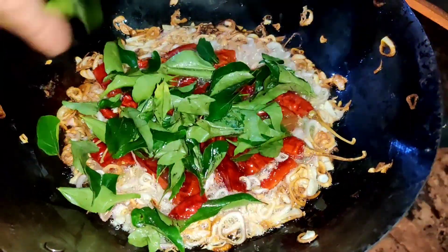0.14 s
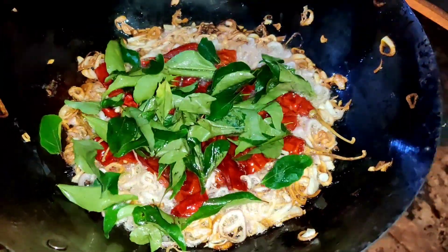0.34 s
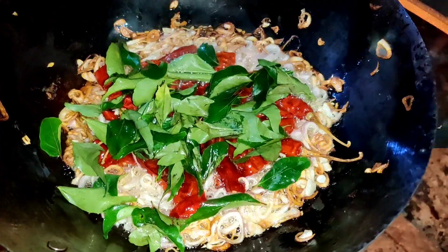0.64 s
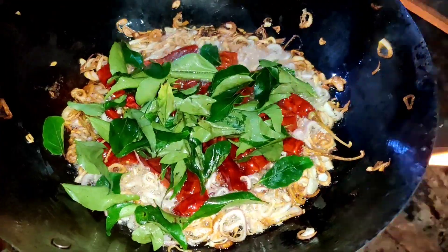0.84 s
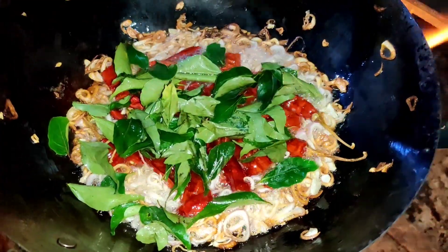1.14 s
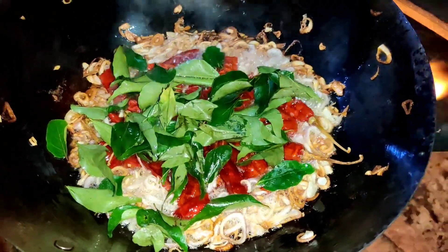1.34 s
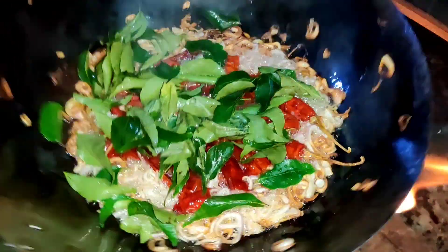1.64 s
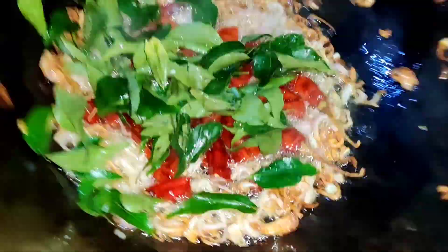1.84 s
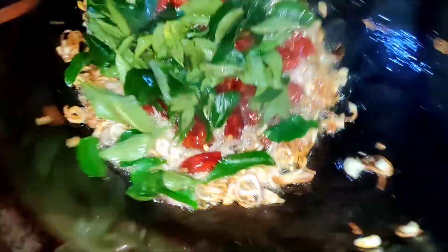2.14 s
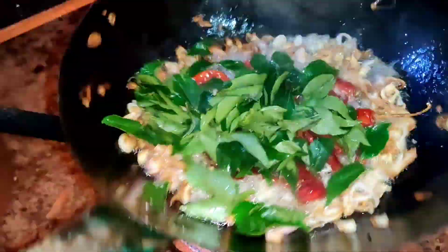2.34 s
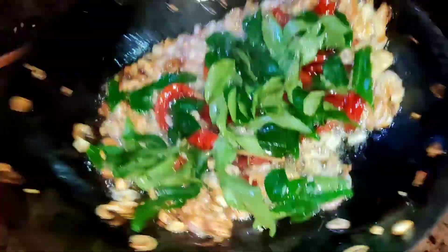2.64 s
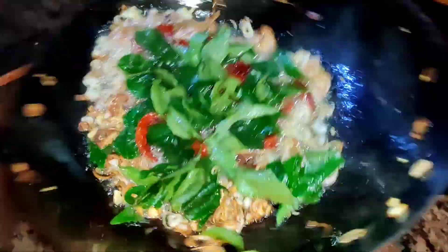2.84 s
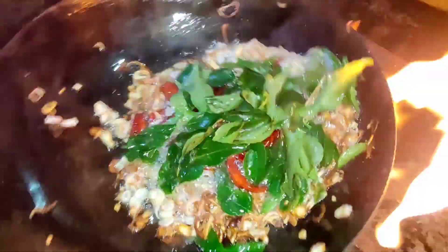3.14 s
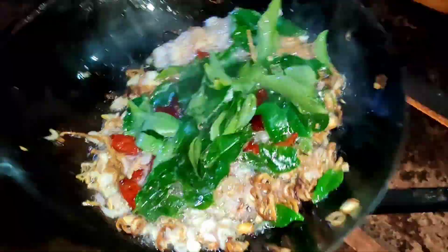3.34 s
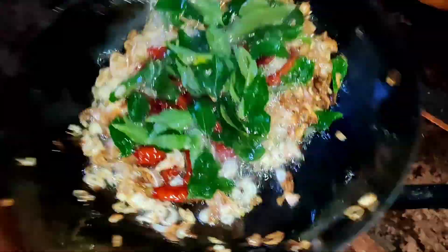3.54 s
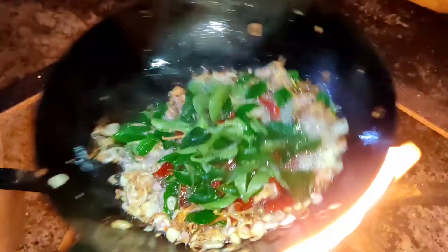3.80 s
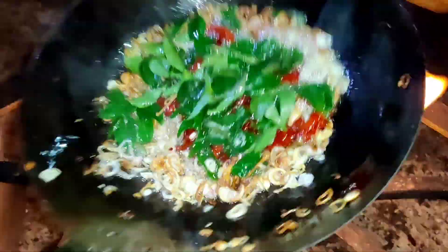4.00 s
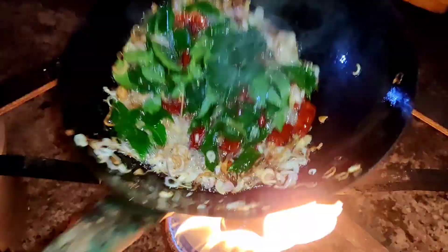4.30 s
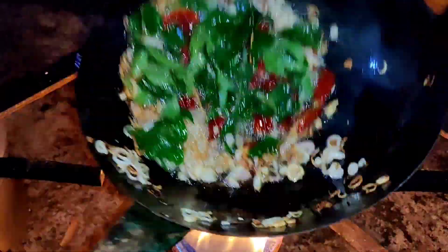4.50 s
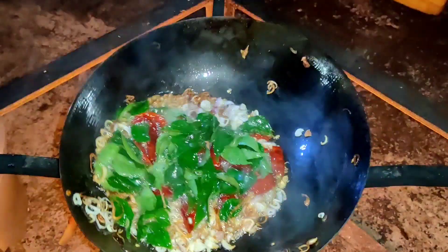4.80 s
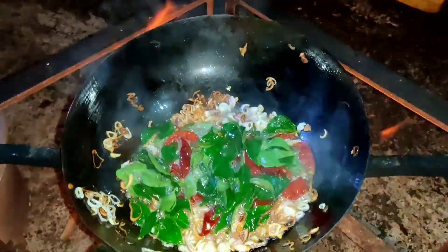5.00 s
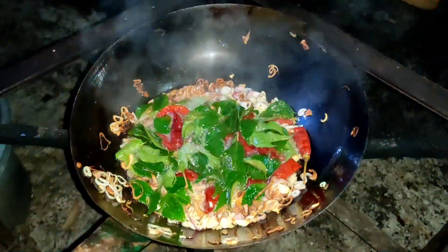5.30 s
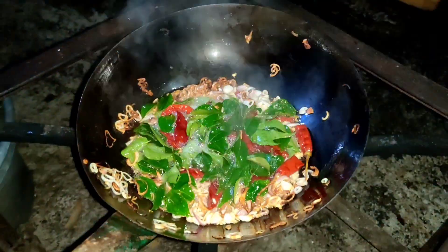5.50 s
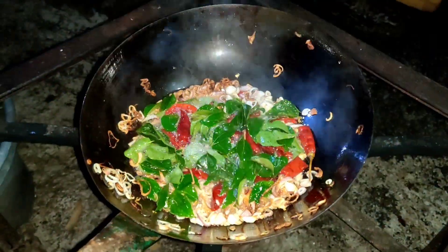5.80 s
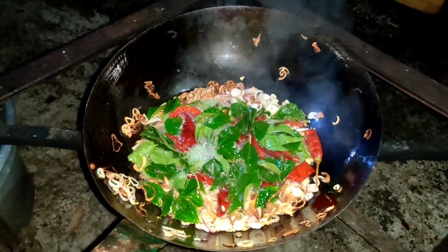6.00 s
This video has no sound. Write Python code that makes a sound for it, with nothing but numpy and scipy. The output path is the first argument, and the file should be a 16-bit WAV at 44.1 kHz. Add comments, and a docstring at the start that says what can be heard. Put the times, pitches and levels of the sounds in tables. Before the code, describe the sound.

Wet leaves crackle, bubble and spit fiercely in hot oil, then a shaken steel wok knocks and grates on its stand before settling to a steady sizzle.

```python
"""Wet leaves fry in hot oil in a steel wok over a gas flame, heard by the two ports of a hand-held phone.
0-1.2 s: plops (rising decaying sines) crowd over spits and fizz (random rings); droplets snap (noise bursts).
At 1.18 s the sound cuts over to another microphone colour. Then the shaken wok knocks and grates on its
stand (struck modes), plops thin out, and from 4.62 s it is set down. The flame (noise bands, a hum) runs
throughout; loud peaks push the gain down for a moment, and at set times the level dips briefly."""
import sys
import numpy as np
from scipy import signal
from scipy.io import wavfile
from scipy.ndimage import uniform_filter1d, minimum_filter1d

SR = 44100
rng = np.random.default_rng(int(sys.argv[2]) if len(sys.argv) > 2 else 0)


def persist_wave(psi):
    """Save psi, clipped to +-1, as 16-bit WAV."""
    counts = np.round(np.clip(psi, -1, 1) * 32767).astype(np.int16)
    wavfile.write(sys.argv[1], SR, np.atleast_2d(counts).T)


N = 271215
CUT_S, SET_DOWN_S = 1.184, 4.62


def from_db(db):
    """Decibels to gain."""
    return 10 ** (np.asarray(db) / 20)


def rms_one(x):
    """Scale to rms 1."""
    return x / np.sqrt(np.mean(x ** 2) + 1e-20)


def before(time_s):
    """True for the samples ahead of a time."""
    return np.arange(N) < time_s * SR


def in_time(rows):
    """Columns of a curve table, one value per sample."""
    times_s, *columns = np.transpose(rows)
    return [np.interp(np.arange(N) / SR, times_s, column) for column in columns]


def spans(rows, edge_s, value):
    """Sum of plateaus with straight edges, one per row of start, length and height."""
    t = np.arange(N) / SR
    total = np.zeros(N)
    for start_s, length_s, height in rows:
        inside_s = np.minimum(t - start_s, start_s + length_s - t)
        total += value(height) * np.clip(inside_s / edge_s, 0, 1)
    return total


def drift(rate_hz):
    """Slow chance with rms 1: coarse noise (every 40 samples) through a double one-pole low-pass."""
    r = np.exp(-2 * np.pi * rate_hz * 40 / SR)
    noise = rng.standard_normal(N // 40 + 2002)
    slow = signal.lfilter([1], [1, -2 * r, r * r], noise)[2000:]
    return np.interp(np.arange(N) / 40, np.arange(len(slow)), rms_one(slow))


def ring(clicks, hz, t60_s):
    """Two-pole resonator: a unit click sets off a decaying sine of height 1."""
    r, w = from_db(-60 / (t60_s * SR)), 2 * np.pi * hz / SR
    return signal.lfilter([0, np.sin(w)], [1, -2 * r * np.cos(w), r * r], clicks + 1e-18)


def band(x, low_hz, high_hz):
    """Butterworth band-pass."""
    return signal.sosfilt(signal.butter(2, [low_hz, high_hz], "band", fs=SR, output="sos"), x)


def high_pass(x, edge_hz):
    """Butterworth high-pass, 4th order."""
    return signal.sosfilt(signal.butter(4, edge_hz, "high", fs=SR, output="sos"), x)


def peaks(x, modes):
    """A chain of peaking filters."""
    for hz, width_hz, db in modes:
        a, w, q = from_db(db / 2), 2 * np.pi * hz / SR, np.tan(np.pi * width_hz / SR)
        numerator = [1 + q * a, -2 * np.cos(w), 1 - q * a]
        denominator = [1 + q / a, -2 * np.cos(w), 1 - q / a]
        x = signal.lfilter(numerator, denominator, x)
    return x


def grains(per_s, low_hz, high_hz, cycles, tilt_db, uneven_db, clump_db, count):
    """Bubbles burst at random all over the wok, so each reaches the two ports with its own lag and balance."""
    clumps = 0.29 * drift(9) + drift(60)
    at = np.flatnonzero(rng.random(N) < per_s * from_db(clump_db * clumps) / SR)
    size_db = uneven_db * np.minimum(rng.exponential(1, N), 4.0)
    size = from_db(size_db)[at] * rng.choice([-1, 1], N)[at]
    lag_spread_samples = np.where(at < CUT_S * SR, 4.8, 3.1)
    lag_samples = np.round(lag_spread_samples * rng.standard_normal(N)[at]).astype(int)
    late = np.clip(at + lag_samples, 0, N - 1)
    pan = from_db(2.0 * rng.standard_normal(N)[at] + 0.8)  # left times, right divided by
    dealt = rng.integers(0, count, N)[at]
    out = np.zeros((2, N))
    for k, hz in enumerate(np.geomspace(low_hz, high_hz, count)):
        clicks, mine = np.zeros((2, N)), dealt == k
        clicks[0, at[mine]] = (size * pan)[mine]
        np.add.at(clicks[1], late[mine], (size / pan)[mine])
        tilt = from_db(tilt_db * np.log2(hz / low_hz))  # dB per octave
        out += tilt * ring(clicks, hz, cycles / hz)
    return rms_one(out)


def flares():
    """Water meets hot oil: fizz gain in dB moves straight to each peak and back."""
    # fizz flares: (peak time [s], rise [s], fall [s], gain [dB])
    flare_rows = [(0.455, 0.012, 0.23, 8), (0.74, 0.024, .12, 1.5), (1.09, 0.085, .1, 4.5),
                  (1.62, 0.073, .1, 5), (1.82, 0.15, 0.031, 6), (2.18, 0.04, 0.087, 4),
                  (2.6, 0.12, 0.058, -1), (3.15, 0.33, 0.099, 3.5), (4.43, 0.025, .02, 3)]
    t = np.arange(N) / SR
    gain_db = np.zeros(N)
    for peak_s, rise_s, fall_s, db in flare_rows:
        gain_db += db * np.interp(t, [peak_s - rise_s, peak_s, peak_s + fall_s], [0, 1, 0])
    return gain_db


def frying():
    """Large bubbles ring low, spits ring higher, the fizz is dense and bright."""
    # the fry in three stretches joined end to end (0-1.18 s, 1.19-3.3 s, 3.31-6.15 s): (time [s], bubbling
    # [dB], spitting [dB], fizz [dB])
    fry_stretches = [
        [(0.0, -38, -39, -35.5), (0.128, -37.5, -38.5, -35.5), (0.358, -36.5, -37.5, -36.5),
         (0.598, -37, -39.5, -35.5), (0.736, -43.5, -39, -36.5), (1.022, -34, -37.5, -37.5),
         (1.18, -28, -32.5, -36.5)],
        [(1.19, -38.5, -38, -41.5), (1.4, -75, -35.5, -41), (1.57, -36, -38.5, -41), (1.82, -51, -37.5, -36),
         (2.12, -59, -36, -33.5), (2.69, -36.5, -36.5, -35.5), (3.3, -49, -36, -38)],
        [(3.31, -49, -36, -36.5), (3.59, -41.5, -37, -34), (4.52, -40.5, -38.5, -42), (4.78, -42, -43, -41),
         (5.19, -37, -37, -41.5), (5.37, -35, -35, -44), (6.15, -35.5, -38, -43.5)],
    ]
    # colour of the frying after set-down: (frequency [Hz], width [Hz], gain [dB])
    late_colour = [(810, 130, -5), (1130, 340, 5.5), (2000, 180, -1.5), (3950, 510, 3)]
    bubbling_db, spitting_db, fizz_db = in_time(np.vstack(fry_stretches))
    calm = np.where(before(5.17), 1, 0.6)  # bubbling evens out once the wok stands still
    bubbling = grains(1200, 680, 1880, cycles=2.55, tilt_db=14.0,
                      uneven_db=4.2 * calm, clump_db=6.0 * calm, count=8)
    spitting = grains(3000, 2260, 3920, cycles=4.8, tilt_db=4.5, uneven_db=4.0, clump_db=3.0, count=8)
    fizz = grains(9000, 5060, 16600, cycles=5.0, tilt_db=0.5, uneven_db=5.0, clump_db=1.0, count=8)
    oil = from_db(bubbling_db) * bubbling
    oil += from_db(spitting_db) * spitting
    oil += from_db(fizz_db + flares()) * fizz
    # the frying has a sharp low edge, higher after 1.18 s
    low_edge, high_edge = high_pass(oil, 590), high_pass(oil, 960)
    high_edge = np.where(before(SET_DOWN_S), high_edge, peaks(high_edge, late_colour))
    return np.where(before(CUT_S), low_edge, high_edge)


def plops():
    """A bursting bubble rings a few cycles while its pitch rises, inside a broad splash."""
    # large bubbles bursting: (time [s], level [dB], pitch [Hz])
    plop_rows = [(0.007, -18, 1110), (0.083, -17, 805), (0.104, -6, 940), (0.133, -12, 790),
                 (0.161, -11, 799), (0.174, -4.5, 1550), (0.182, -15, 1810), (0.282, -14, 1530),
                 (0.288, -11.5, 1310), (0.299, -10.5, 810), (0.328, -11, 2860), (0.374, -6, 1280),
                 (0.398, -7, 810), (0.416, -22, 2170), (0.458, -9, 1200), (0.475, -11, 3400),
                 (0.641, -11.5, 1510), (0.653, -15.5, 800), (0.7, -10, 830), (0.718, -12.5, 1530),
                 (0.756, -11, 3080), (0.845, -18, 1310), (0.977, -12, 2040), (1.02, -13, 1210),
                 (1.055, -12, 840), (1.081, -5, 860), (1.084, -2.5, 784), (1.111, -5.5, 1200),
                 (1.161, -10.5, 905), (1.172, -3.5, 760), (1.176, -0.5, 1210), (1.206, -11, 1610),
                 (1.797, -19, 1550), (1.988, -15.5, 2380), (2.616, -18, 1220), (3.503, -16, 1550),
                 (4.182, -13, 1310), (4.203, -15, 1920), (4.418, -14, 2490), (4.894, -16, 1280),
                 (5.017, -19.5, 2410), (5.09, -16, 2200), (5.191, -12.5, 1310), (5.205, -11.5, 2300),
                 (5.38, -6.5, 2290), (5.703, -12.5, 1210), (5.726, -13.5, 2850)]
    out, t = np.zeros((2, N)), np.arange(1200) / SR
    for time_s, db, hz in plop_rows:
        cycles = 9.7 * (hz / 1000) ** 0.9  # until 60 dB down
        decay = from_db(-60 * t * hz / cycles)
        tone = np.sin(2 * np.pi * hz * (0.94 * t + 25 * t ** 2)) * decay
        tone *= 1 - np.exp(-t / 0.0016)
        splash = 0.83 * band(rng.standard_normal(len(t)) * np.exp(-t / 0.00098), 860, 2830)
        pan_db = 5.5 + 4 * rng.standard_normal()  # left minus right
        piece = from_db(db) * (tone + splash)
        at = round(time_s * SR)
        out[:, at:at + len(t)] += np.outer(from_db([pan_db / 2, -pan_db / 2]), piece[:N - at])
    return out


def bowl(x):
    """The steel bowl scatters bursts into a few milliseconds of echoes: all-pass, so no colouring."""
    # scatter in the bowl: (delay [samples], feedback [gain])
    echo_rows = [(19, .5), (37, .4)]
    for lag_samples, feedback in echo_rows:
        taps = np.zeros(round(lag_samples) + 1)
        taps[[0, -1]] = 1, -feedback
        x = signal.lfilter(taps[::-1], taps, x)
    return x


def snaps():
    """A droplet flashes to steam: a sharp crack and a spray of a few milliseconds, its own at each port."""
    # droplets snapping: (time [s], peak before the band-pass [dB], left minus right [dB])
    snap_rows = [(0.036, -8, -3), (0.0932, -13, 2), (0.241, -13, 1), (0.2718, -11, 0.0), (0.3493, -14, 2.0),
                 (0.3965, -26, 1), (0.4538, -15, -17), (0.5693, -7.5, 14), (0.7447, -11.5, 4),
                 (0.7761, -2, 0), (0.794, -15, -1), (0.816, -17, -5), (0.832, -13.5, -13),
                 (0.9472, -11.5, -3), (1.018, -18, -6), (1.09, -18, 11), (1.11, -17, 22), (1.137, -17, 14),
                 (1.511, -18, -3), (1.576, -19, 3), (1.6257, -18, 4), (1.67, -17, 13.5),
                 (1.9024, -12, -1.5), (1.991, -21, 10), (2.141, -14, -1), (2.2636, -24, 16),
                 (2.374, -18, -1), (2.7356, -25, 3.0), (2.9232, -14.5, -8.5), (3.7595, -15, 10.5),
                 (3.9994, -19, -4), (4.429, -15.5, 2.0), (4.512, -23, -8.5), (4.5373, -18, 2),
                 (4.945, -16, 10.5), (5.037, -21, 14), (5.1148, -18, 13.5), (5.382, -27, -6)]
    out, t = np.zeros((2, N)), np.arange(600) / SR
    envelope = np.exp(-t / 0.00085) + 0.23 * np.exp(-t / 0.0014)
    for time_s, db, pan_db in snap_rows:
        spray = rng.standard_normal((2, len(t))) * envelope
        spray /= np.abs(spray).max(axis=1, keepdims=True)
        gain = from_db(db + np.array([[pan_db], [-pan_db]]) / 2)
        at = round(time_s * SR)
        out[:, at:at + len(t)] += gain * spray[:, :N - at]
    return band(out, 1500, 20000)


def knocks():
    """Knocks and fine grating are soft contacts; each strikes every mode with a strength of its own."""
    # wok on its stand: (time [s], blow [dB], extra on long rings [dB], brightness re 1200 Hz [dB/octave])
    knock_rows = [(1.604, -20.5, -12, -2.5), (1.61, -24, 0, 0), (1.653, -20, -25, -3.8),
                  (1.669, -25.5, -2, -3), (1.853, -12, 2, -0.6), (2.016, -31, 0, 7),
                  (2.315, -12.5, 1.5, -2.2), (2.672, -11, 3, -0.5), (3.197, -13, -1.5, -0.7),
                  (4.644, -18.5, 2, -3.5), (4.658, -30, -11, -6), (4.682, -26.5, -1, -5),
                  (4.754, -21, -15, -1), (4.795, -26.5, -5, 2), (4.8, -23.5, -9, 2)]
    # damped thud modes, then faint bowl rings: (frequency [Hz], level [dB], t60 [s])
    wok_modes = [(260, -4, 0.0077), (913, -1, 0.019), (1110, 1.5, 0.026), (1310, 4.5, 0.021),
                 (1557, -0.5, 0.02), (2300, -6, 0.014), (3050, -8.5, 0.014), (3910, -6.5, 0.07),
                 (156, -43.5, 0.65), (324, -36, 0.64), (429, -35, 0.84), (448, -30, 0.53),
                 (1115, -28, 0.44), (2410, -28, 0.4), (2940, -16.5, 0.25)]
    # wok grating on its stand: (start [s], length [s], level [dB])
    grate_rows = [(1.27, .27, -43), (1.58, .14, -41), (1.78, 1.5, -50), (3.3, .15, -44), (4.63, .2, -41)]
    # gap between thud and knock: (frequency [Hz], width [Hz], gain [dB])
    gap_modes = [(590, 340, -13)]
    times_s, blow_db, free_db, bright_db = np.transpose(knock_rows)
    at, out = np.round(times_s * SR).astype(int), np.zeros(N)
    grit = (rng.random(N) < 260 / SR) * from_db(2.2 * rng.standard_normal(N))
    grit *= spans(grate_rows, 0.04, from_db)
    for k, (hz, level_db, t60_s) in enumerate(wok_modes):
        clicks = grit * rng.standard_normal(N)
        lasting = t60_s > 0.1
        chance_db = rng.normal(0, 1.2, len(at))
        clicks[at] += from_db(blow_db + lasting * free_db + bright_db * np.log2(hz / 1200) + chance_db)
        slosh_db = lasting * 2.0 * drift(15)  # the moving food damps the long rings unevenly
        # alternate signs: neighbours cancel between the modes
        out += (-1) ** k * from_db(level_db + slosh_db) * ring(clicks, hz, t60_s)
    contact = np.hanning(16)
    soft = np.convolve(out, contact / contact.sum())[:N]
    return peaks(band(soft, 97, 12000), gap_modes)


def flame():
    """A roar, a deeper rumble, a lumpy flutter and a wavering hum, almost alike at both ports."""
    # flame, in three stretches: (time [s], roar [dB], flutter [dB])
    flame_stretches = [
        [(0.0, -59, -51), (0.314, -57, -52.5), (0.994, -61, -49.5), (1.18, -53, -51)],
        [(1.19, -63, -59), (1.97, -56.5, -61), (3.47, -54, -61), (4.0, -60, -63)],
        [(4.01, -58.5, -60), (4.49, -59, -62), (4.93, -56, -61), (6.15, -57, -73)],
    ]
    roar_db, flutter_db = in_time(np.vstack(flame_stretches))
    rumble_db = np.where(before(SET_DOWN_S), -60.5, -57)
    rumble_db = rumble_db + 0.43 * (roar_db - roar_db.mean())  # follows part of the roar's swing
    mid, side = rng.standard_normal((2, 4, N))
    air = mid[:, None] + 0.22 * side[:, None] * [[1], [-1]]
    roar = rms_one(band(air[0], 224, 660)) * from_db(roar_db + 3.0 * drift(4.7))
    rumble = rms_one(band(air[1], 109, 230)) * from_db(rumble_db + 2.0 * drift(1.6))
    flutter = rms_one(band(air[2], 20, 85)) * from_db(flutter_db + 2.2 * drift(2.5))
    hum = rms_one(ring(air[3], 63.4, 0.34)) * from_db(-64.5)
    return (roar + rumble + flutter + hum) * from_db([[0.3], [-0.3]])


def scene():
    """All sources at the microphone ports."""
    return bowl(frying() + plops()) + snaps() + knocks() + flame()


def limiter(x):
    """Sound above the threshold lowers the gain a moment too late to catch the peak; it holds, then comes back."""
    hold_s, attack_s, release_db_per_s = 0.046, 0.002, 600
    threshold_db = np.where(before(CUT_S), -9, -15.5)
    power = uniform_filter1d(x ** 2, size=90).max(axis=0)
    level_db = 10 * np.log10(2 * np.abs(power) + 1e-12)
    over_db = level_db - threshold_db
    hold = round(hold_s * SR)
    held_db = -minimum_filter1d(-over_db, size=hold, origin=(hold - 1) // 2)  # past maximum
    fall_db = release_db_per_s * np.arange(N) / SR
    cut_db = np.maximum.accumulate(np.maximum(held_db, 0) + fall_db) - fall_db
    r = np.exp(-1 / (attack_s * SR))
    return x * from_db(-signal.lfilter([1 - r], [1, -r], cut_db))


def record(dry):
    """Port resonances before and after the cut, limiter, brief dips, steep top cut."""
    # port resonances before and after the cut, left then right: (frequency [Hz], width [Hz], gain [dB])
    ports_early = [
        [(5090, 740, 14), (7040, 1800, -6), (12400, 3300, -4)],
        [(4130, 580, -9), (6440, 4600, 5), (12400, 1400, -4)],
    ]
    ports_late = [
        [(8060, 1260, -9), (9580, 3530, 17.5), (12200, 3400, -9.5)],
        [(7860, 4200, -6), (10000, 6000, 0), (14200, 14000, 8.5)],
    ]
    # the level dips briefly: (start [s], length [s], depth, sign ignored [dB])
    dip_rows = [(1.945, 0.041, 4), (2.22, 0.03, 5.5), (4.44, 0.0091, -5), (4.605, .03, 1.5),
                (5.04, 0.048, 3.5), (5.118, 0.06, 7)]
    early = np.array([peaks(x, modes) for x, modes in zip(dry, ports_early)])
    late = np.array([peaks(x, modes) for x, modes in zip(dry, ports_late)])
    crossfade = np.clip((np.arange(N) / SR - CUT_S) / 0.0028, 0, 1)
    heard = limiter(early + crossfade * (late - early))
    heard = heard * from_db(-spans(dip_rows, 0.0063, abs))
    return signal.sosfilt(signal.cheby2(14, 70, 16100, fs=SR, output="sos"), heard)


dry = scene()
out = record(dry)
persist_wave(out)
```